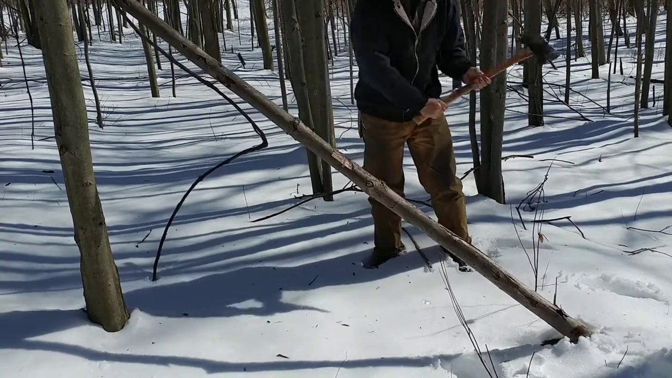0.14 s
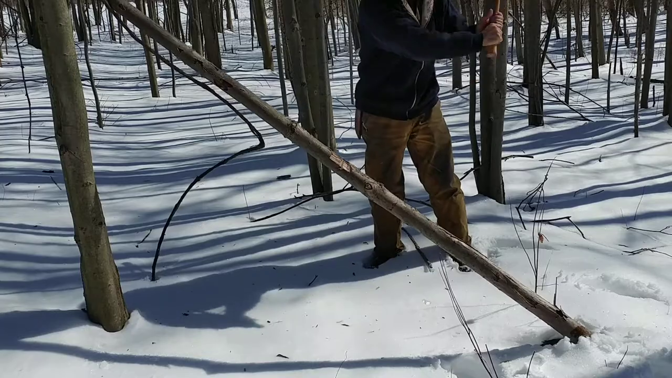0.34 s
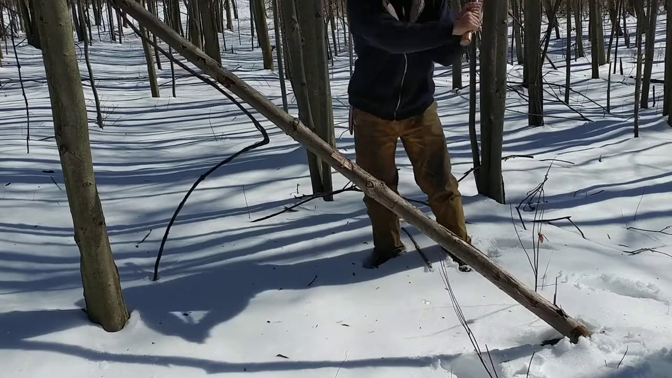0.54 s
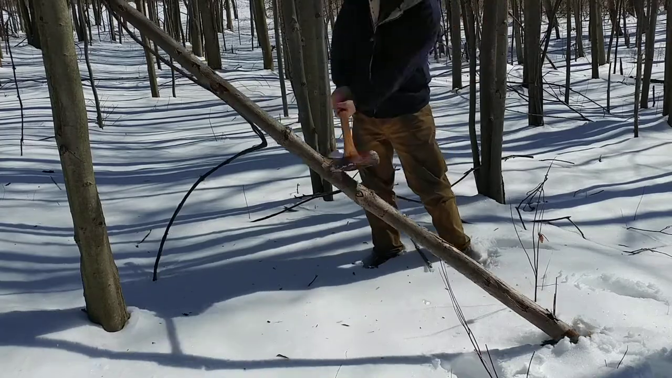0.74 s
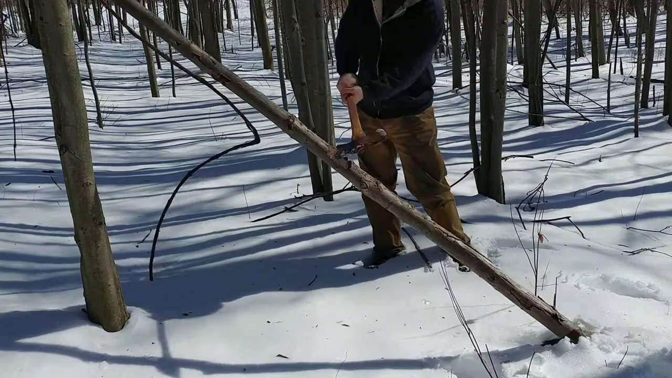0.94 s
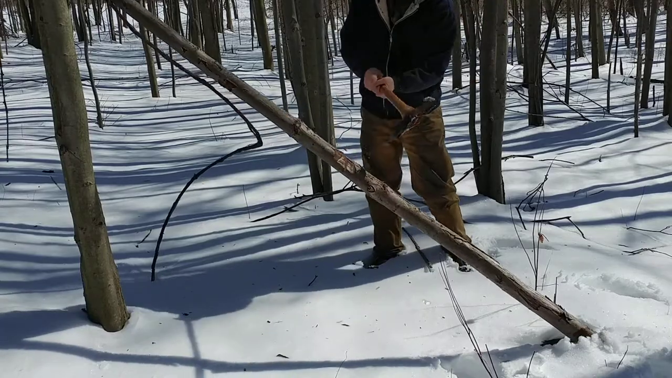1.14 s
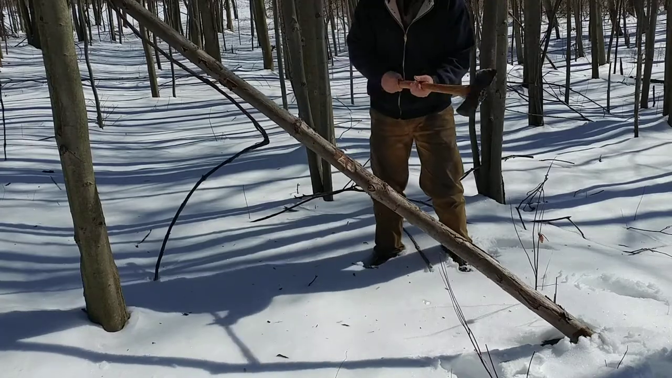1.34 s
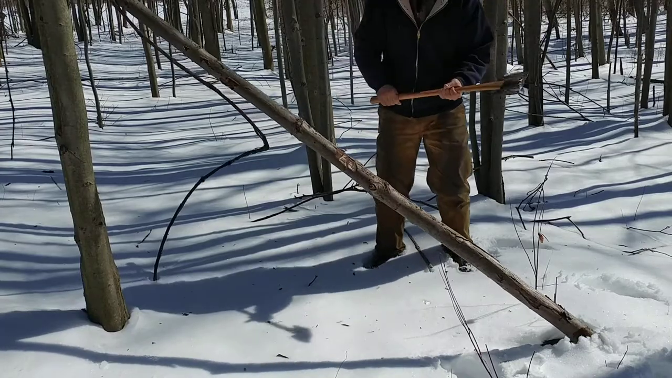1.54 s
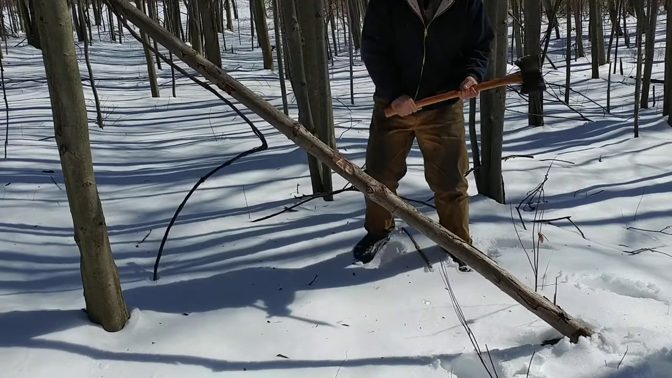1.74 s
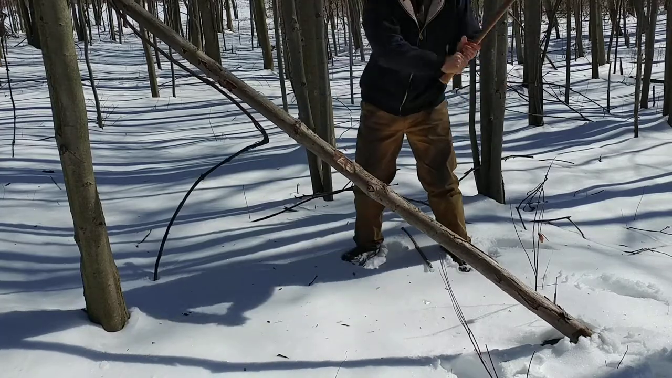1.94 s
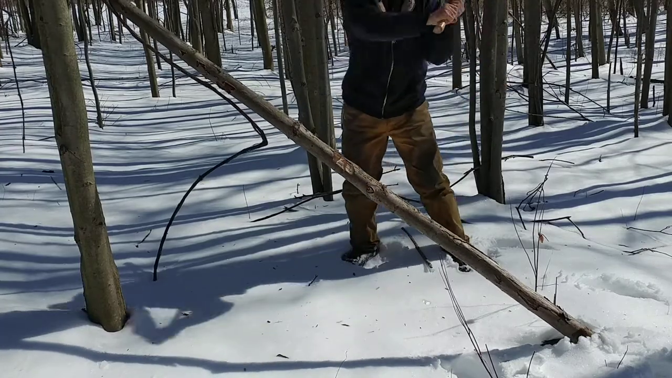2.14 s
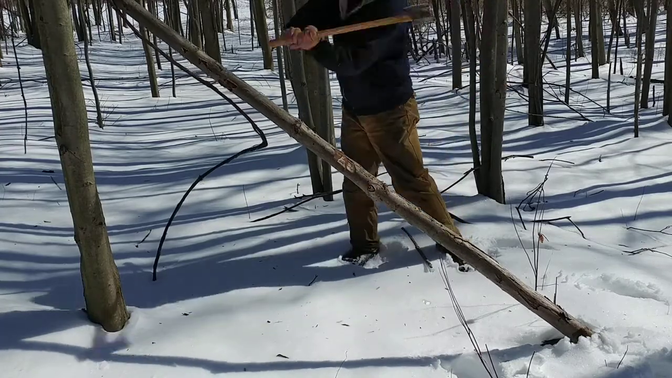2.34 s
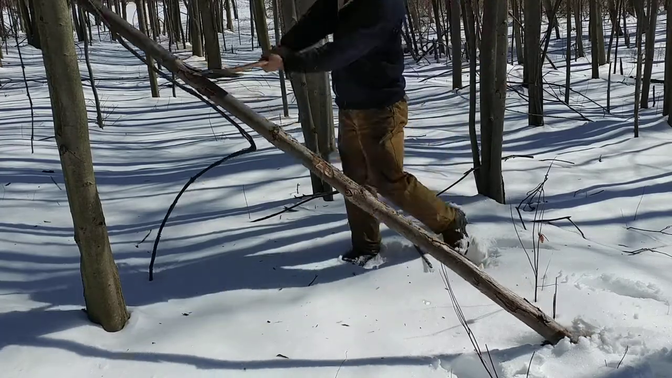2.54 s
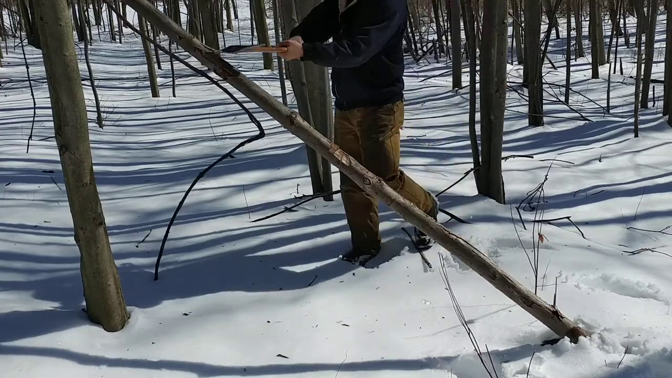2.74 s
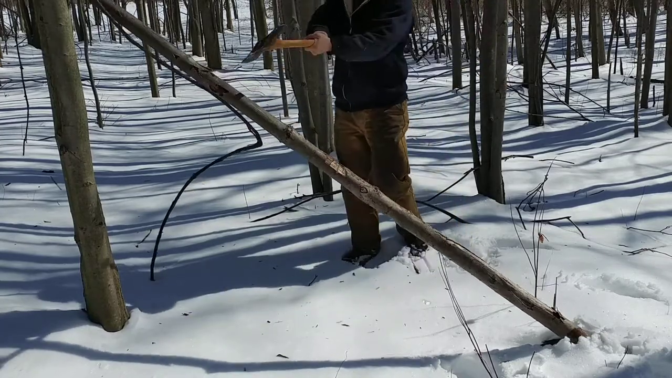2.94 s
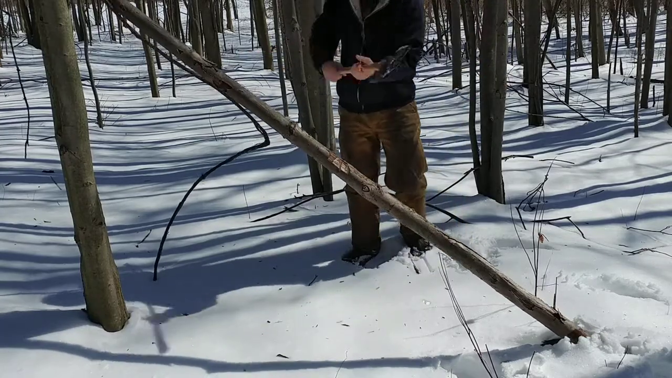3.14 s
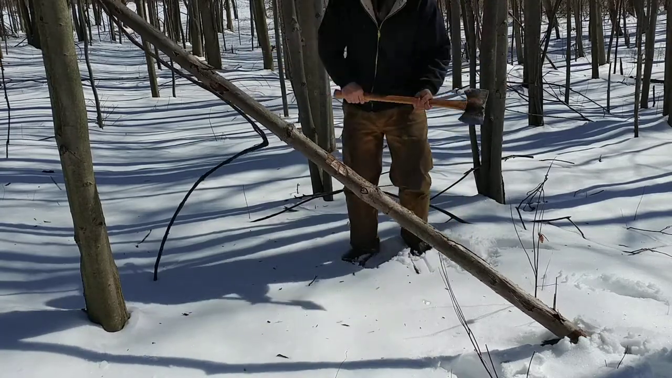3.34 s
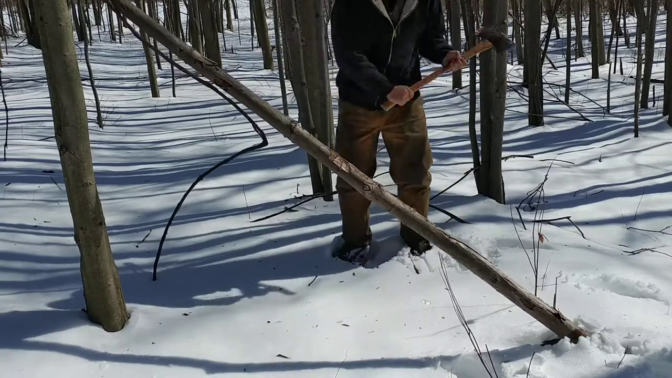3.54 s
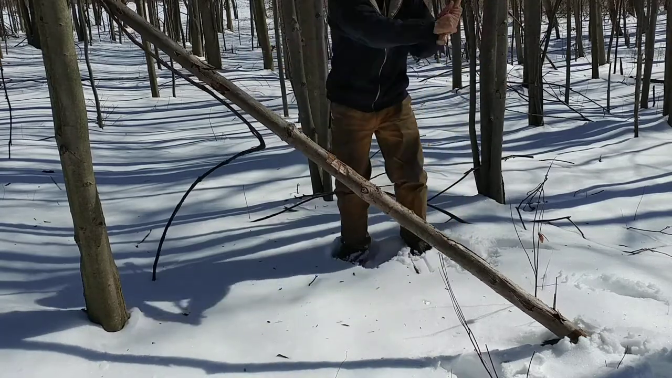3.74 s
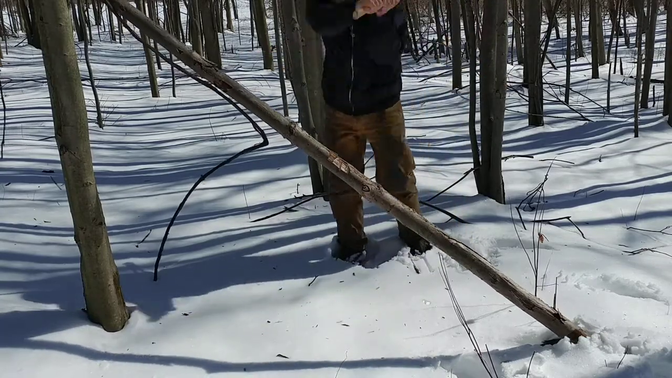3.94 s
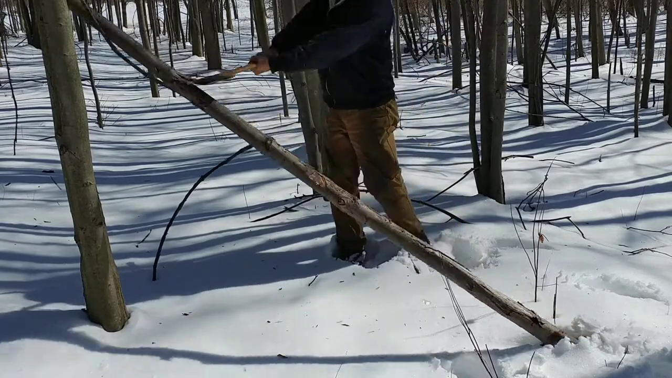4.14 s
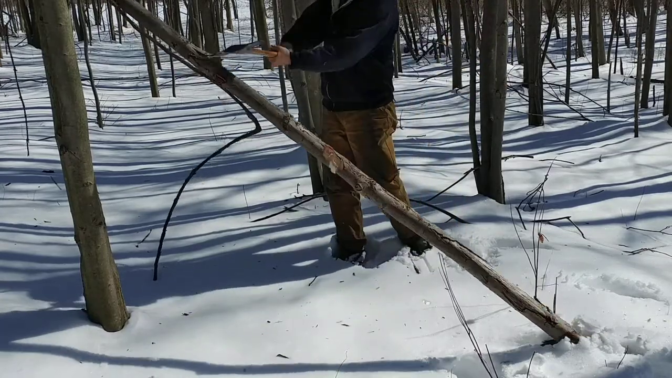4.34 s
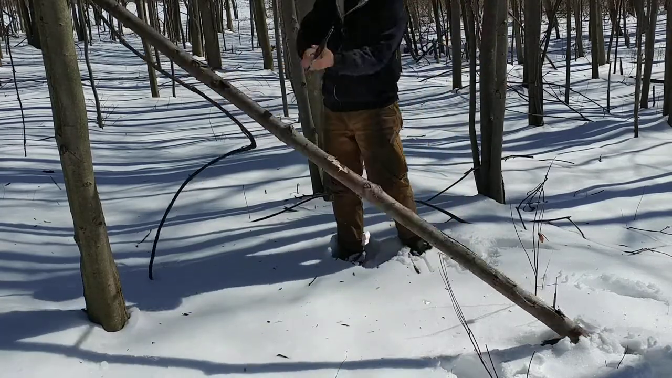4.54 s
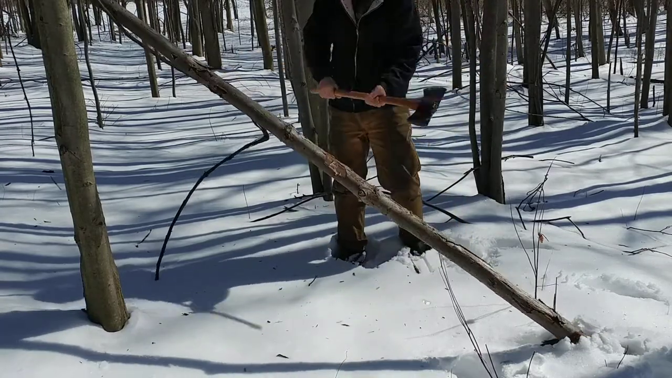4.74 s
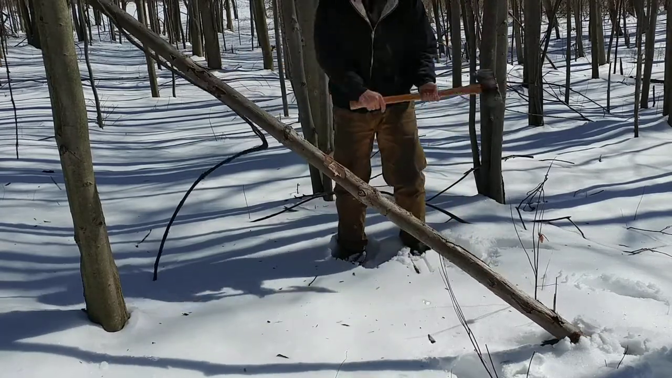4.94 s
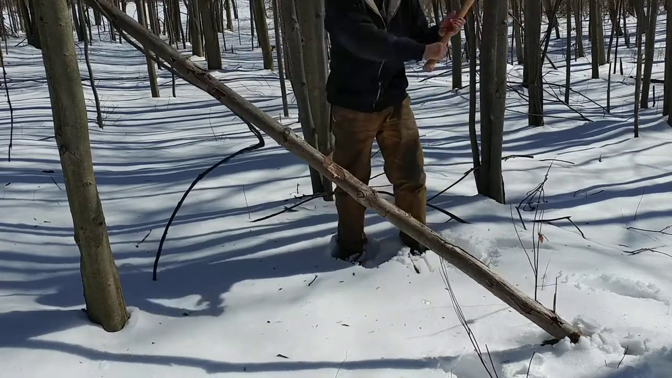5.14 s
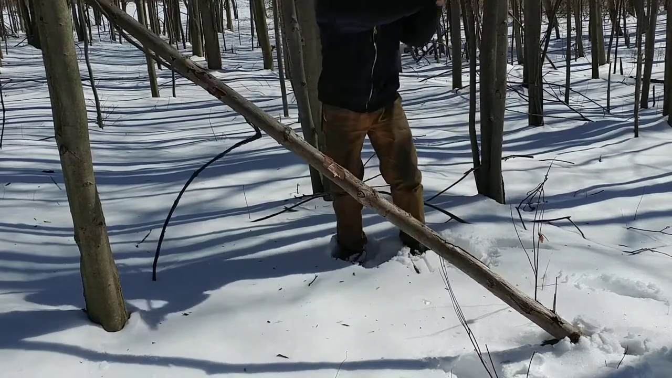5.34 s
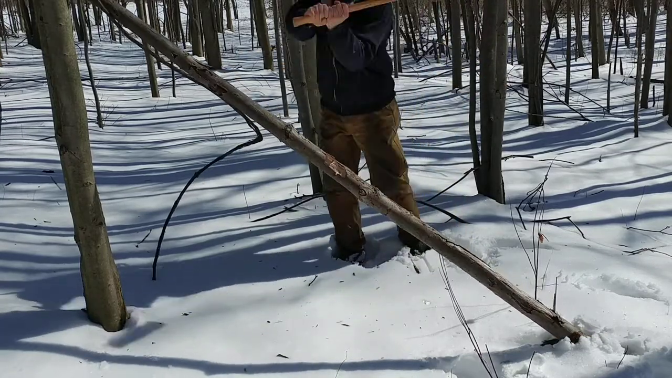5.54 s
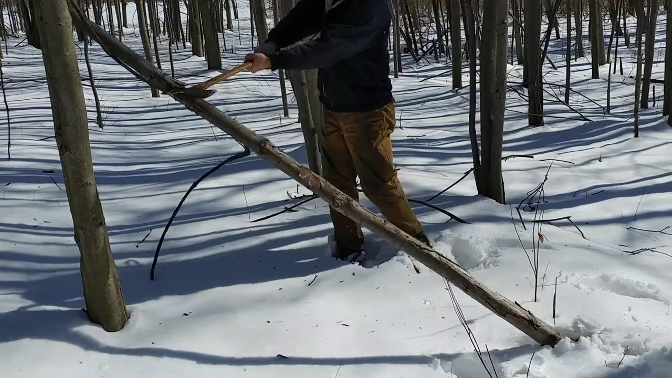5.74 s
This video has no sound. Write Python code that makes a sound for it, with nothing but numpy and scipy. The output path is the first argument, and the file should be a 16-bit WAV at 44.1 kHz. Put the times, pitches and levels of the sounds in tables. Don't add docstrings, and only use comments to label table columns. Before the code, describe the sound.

Outdoor wood chopping heard from nearby with a small stereo microphone, action slightly left. After a quiet opening with light wind buffeting and tiny metallic taps, four loud axe strokes land on dry standing wood. Each snaps brightly, thuds low, then tumbles into irregular hollow knocks and fine splintery crackle. Clothing and snow rustle in the pauses, bits of wood patter down, and the surrounding trunks return a soft, diffuse echo.

```python
import sys
import numpy as np
from scipy import signal
from scipy.fft import rfft, irfft, next_fast_len
from scipy.io import wavfile
from scipy.ndimage import uniform_filter1d, map_coordinates

SR = 44100
rng = np.random.default_rng(int(sys.argv[2]) if len(sys.argv) > 2 else 0)


def pcm_store(signal):
    levels = np.round(np.clip(np.atleast_2d(signal), -1, 1) * 32767)
    wavfile.write(sys.argv[1], SR, levels.astype(np.int16).T)


def voltage_ratio(level):
    return 10 ** (np.asarray(level, float) / 20)


N = 259308


def unit(x):
    return x / np.sqrt(np.mean(x ** 2) + 1e-20)


def along(points, hz):
    f, v = np.transpose(points)
    return np.interp(np.log(hz + 1), np.log(f + 1), v)


def wobble(rate):
    knots = rng.standard_normal(int(N * rate / SR) + 4)
    return map_coordinates(knots, [np.arange(N) * rate / SR])


def filtered(x, response):
    size = next_fast_len(x.shape[-1] + 8192)
    spectrum = rfft(x, size) * response(np.fft.rfftfreq(size, 1 / SR))
    return irfft(spectrum, size)[..., :x.shape[-1]]


def peak(f, hz, width):
    return 1j * f * width / (hz * hz - f * f + 1j * f * width)


def modes(f, rows, gains):
    return sum((-1) ** k * gains[k] * peak(f, hz, width) for k, (hz, width, _) in enumerate(rows))


def pair(length, alike):
    mid, side = rng.standard_normal((2, length))
    turn = np.arccos(alike) / 2
    return np.cos(turn) * mid + np.sin(turn) * side * np.array([[1], [-1]])


def patchy(x, depth_db):
    z = signal.stft(x, nperseg=256)[2]
    field = rng.standard_normal(z.shape[1:])
    for axis in (0, 1):
        field = uniform_filter1d(field, size=8, axis=axis)
    return signal.istft(z * voltage_ratio(depth_db * unit(field)), nperseg=256)[1][:, :N]


def add(track, s, sound, pan_db):
    track[:, round(s * SR):][:, :sound.shape[1]] += sound * voltage_ratio(np.array([[pan_db], [-pan_db]]) / 2)


# time in seconds, level in dB.
GUSTS = [(0, -56), (.15, -68), (.5, -60.5), (.87, -67.5), (1.05, -49), (1.5, -59.5), (1.85, -69.5),
         (2.08, -54.5), (2.55, -59), (3.05, -58.5), (3.3, -52.5), (3.55, -60), (3.72, -61), (3.9, -59.5),
         (4.2, -61.5), (4.45, -50), (5.0, -57), (5.2, -65), (5.7, -58), (5.88, -49)]


def gust_db():
    return np.interp(np.arange(N) / SR, *np.transpose(GUSTS))


# frequency in Hz, level in dB per Hz.
RUMBLE = [(15, -40), (25, -31), (38, -5), (59, 4.5), (135, -12), (290, -22), (350, -21), (460, -47.5),
          (770, -120)]


def wind():
    lumps = filtered(pair(N, .62), lambda f: voltage_ratio(along(RUMBLE, f)))
    lumps = lumps * voltage_ratio(0.67 * wobble(8.5))
    return voltage_ratio(gust_db() + 5.5) * unit(lumps)


# frequency in Hz, level in dB per Hz.
HUSH = [(150, -37), (250, -22.5), (337, -30.5), (450, -9.5), (567, -2.5), (1270, -22.5), (1650, -29),
        (2500, -32.5), (3250, -63.5), (5500, -120)]
# start in seconds, level in dB, t60 in seconds.
CROWN = [
    (0.918, -28, 1.3),
    (2.58, -37, 1.96),
    (4.271, -30.5, 1.77),
    (5.81, -55, 3),
]


def hush():
    t, gusts = np.arange(N) / SR, gust_db()
    murmur = sum(voltage_ratio(db - 60 * np.abs(t - s) / t60) * (t > s) for s, db, t60 in CROWN)
    far_wood = voltage_ratio(-60 + 0.37 * (gusts - gusts.mean()))
    flutter = voltage_ratio(1.8 * wobble(29))
    branches = filtered(pair(N, 0.12), lambda f: voltage_ratio(along(HUSH, f))) * flutter
    return (far_wood + murmur) * unit(branches)


# frequency in Hz, level in dB per Hz.
HISS = [(900, -45), (1500, -18), (2200, -15), (3300, -7), (4200, -8), (5900, -6), (7600, -1), (9050, -16),
        (10600, -4), (12000, -12), (15400, -17), (16000, -22), (16500, -45)]


def hiss():
    noise = filtered(pair(N, 0.73), lambda f: voltage_ratio(along(HISS, f))) * voltage_ratio(1.5 * wobble(5.4))
    whine = filtered(pair(N, .5), lambda f: peak(f, 11250, 200) ** 2) * voltage_ratio(2.5 * wobble(4))
    return voltage_ratio(-70) * unit(noise) + voltage_ratio(-79) * unit(whine)


# start in seconds, peak in dB, left over right in dB, tilt in dB per octave.
TAPS = [(0.541, -50, -6, -3), (0.1311, -60, 15, 19), (0.397, -22.5, 5.5, 7), (0.4005, -24, 2.5, -4.5),
        (0.407, -33.5, -2, -7.5), (0.547, -46, 9, -9), (0.5509, -38.5, -6, -3.5), (0.559, -41, -13, 0),
        (0.585, -58, -20, -15), (0.688, -66, -1, 0), (0.744, -36, 5.5, 1), (0.751, -47, 3, 5),
        (0.771, -58, 13, 5)]
# frequency in Hz, width in Hz, level in dB.
PULL = [(2830, 540, -7), (4820, 450, -2.5), (7180, 300, 13), (8230, 660, -3), (10500, 1700, 1),
        (13170, 300, -23)]


def zip_pull():
    out, t = np.zeros((2, N + SR)), np.arange(SR // 20) / SR
    hz, _, level_db = np.transpose(PULL)
    for s, db, pan_db, tilt_db in TAPS:
        gains = voltage_ratio(rng.normal(0, 1, len(PULL))) * voltage_ratio(level_db + tilt_db * np.log2(hz / 7000))

        def metal(f):
            ring = modes(f, PULL, gains)
            low_cut = f * f / (f + 1800 / 1j) ** 2
            return ring * np.abs(ring) ** 0.37 * low_cut

        scratch = pair(len(t), .9) * voltage_ratio(-60 * t / .015)
        tap = filtered(scratch, metal)
        add(out, s - .0003, voltage_ratio(db + 8) * tap / np.abs(tap).max(), pan_db - 4.5)
    return out[:, :N]


# middle in seconds, spread in seconds, level in dB,
# dull part over bright part in dB.
RUSTLE = [(0.43, 0.027, -59.5, -9), (0.589, 0.015, -56.5, 0), (0.78, 0.025, -71, -23),
          (1.121, 0.015, -69.5, 8), (1.249, 0.1, -59.5, 2), (1.488, 0.022, -56, -10.5),
          (1.569, 0.022, -65, 2), (1.74, 0.04, -67, -5), (1.829, 0.023, -64.5, -20),
          (2.031, 0.069, -58.5, -8), (2.302, 0.055, -66, -2.5), (2.942, 0.03, -49, -1.5),
          (3.03, 0.092, -63, 6), (3.13, 0.017, -54, -8), (3.2, 0.025, -61, -9), (3.348, 0.065, -56.5, -8),
          (3.62, 0.076, -61, -8), (3.851, 0.11, -71, -2.5), (4.234, 0.011, -63.5, 8.5),
          (4.601, 0.045, -46.5, -5), (4.757, 0.032, -51, -18), (4.871, 0.012, -50.5, 5),
          (4.901, 0.055, -54, -7), (5.066, 0.0095, -53, -12), (5.131, 0.02, -46.5, 0.5),
          (5.332, 0.015, -54, -0.5), (5.386, 0.016, -47.5, -2), (5.7, 0.12, -70, 1.5)]


def rustle():
    t = np.arange(N) / SR
    middle, spread, db, dull_db = np.transpose(RUSTLE)[..., None]
    swell = voltage_ratio(db) * np.exp(-((t - middle) / spread) ** 2 / 2)
    grain = voltage_ratio(1.3 * wobble(160) + 2.4 * wobble(2100))
    fine = patchy(pair(N, .6), depth_db=3) * grain
    coarse = patchy(pair(N, .6), depth_db=2.5) * grain
    bright = filtered(fine, lambda f: f ** 4 / (f ** 4 + 4500 ** 4))
    dull = filtered(coarse, lambda f: peak(f, 2950, 1600) ** 2)
    dull_swell = swell * voltage_ratio(dull_db - 12)
    return swell.sum(0) * unit(bright) + dull_swell.sum(0) * unit(dull)


# start in seconds, peak in dB, centre in Hz, rattle in dB.
BLOWS = [
    (0.903, -11.5, 807, -41.5),
    (0.913, -6, 610, -15.5),
    (2.569, -8.5, 674, -41.5),
    (2.575, 0, 824, -11),
    (4.255, -15, 568, -1.5),
    (4.262, 0, 752, -13),
    (5.801, -5, 650, -12.5),
    (5.806, -7.5, 815, -11),
]
# start in seconds, peak in dB, centre in Hz,
# rattle in dB.
REBOUNDS = [(0.931, -10, 654, -17.5), (0.998, -10.5, 1080, -7.5), (1.039, -19.5, 755, -8),
            (1.2, -18.5, 774, -5.5), (1.289, -18, 900, -13.5), (1.304, -22.5, 733, -8.5),
            (2.747, -11, 1033, 1), (2.841, -16, 843, -2), (2.887, -22.5, 650, -4),
            (2.904, -24.5, 794, -1.5), (3.004, -18.5, 804, -4.5), (3.119, -26, 745, 3),
            (3.255, -25.5, 748, -9), (4.365, -9, 758, -8.5), (4.434, -22.5, 720, 3.5),
            (4.477, -8.5, 986, -15.5), (4.522, -10, 824, -12.5), (4.65, -15, 670, -14.5),
            (4.726, -12.5, 613, -9.5), (4.846, -20.5, 574, -23), (5.056, -21.5, 728, -10.5),
            (5.353, -20.5, 676, -5.5)]
# start in seconds, peak in dB, centre in Hz.
SHUDDERS = [(0.92, -2, 621), (0.945, -24, 608), (0.959, -12.5, 866), (0.983, -18.5, 660), (1.01, -16, 666),
            (1.022, -9.5, 815), (1.234, -25, 655), (2.589, -14, 678), (2.6, -6.5, 642), (2.62, -12, 627),
            (2.643, -15, 693), (2.752, -12, 1005), (2.761, -9, 681), (3.134, -22.5, 636),
            (3.3135, -31, 677), (4.272, -10.5, 1205), (4.292, -12, 684), (4.309, -22, 624),
            (4.339, -12.5, 1260), (4.395, -13.5, 622), (4.449, -16.5, 704), (4.539, -12, 875),
            (4.578, -15.5, 710), (4.669, -21, 594), (4.745, -5.5, 767), (4.791, -18.5, 556),
            (5.814, -2, 887), (5.823, -14, 630), (5.848, -2.5, 747), (5.86, -18, 748)]
# start in seconds, peak in dB.
SETTLES = [
    (1.107, -60),
    (2.061, -45.5),
    (2.101, -42),
    (2.335, -41),
    (3.413, -45.5),
    (3.889, -46),
    (3.987, -45.5),
    (4.995, -36.5),
]


def contacts():
    spread_s = 0.003958
    blow_spread_s = .001
    settle_hz, clean_rattle_db = 520, -22.5
    blow_t60_s, grind_t60_s, clean_t60_s = 0.41, 0.12, 0.32
    clean = SHUDDERS + [(s, db, settle_hz) for s, db in SETTLES]
    touches = [(*row, blow_t60_s, blow_spread_s) for row in BLOWS]
    touches += [(*row, grind_t60_s, spread_s) for row in REBOUNDS]
    touches += [(*row, clean_rattle_db, clean_t60_s, spread_s) for row in clean]
    return sorted(touches)


# frequency in Hz, width in Hz, level in dB.
TRUNK = [(187, 230, -7.5), (290, 260, -7.5), (367, 40, -8.5), (465.3, 25, -7), (598, 130, -1),
         (628, 12, 6.5), (710, 19, 1), (835, 15, -1), (960, 19, -7), (1053, 17, -2.5), (1250, 17, -8.5),
         (1610, 30, -11), (1850, 230, -15), (2080, 180, -10)]


def trunk():
    out, t = np.zeros((2, N + SR)), np.arange(SR // 4) / SR
    push = np.exp(-(t / 0.00015 - 2) ** 2)
    level_db = np.transpose(TRUNK)[2]
    for s, db, hz, rattle_db, t60, spread in contacts():
        fibres = pair(len(t), .6)
        rattle = voltage_ratio(rattle_db - 60 * t / t60) * fibres * (1 - np.exp(-t / 0.00061))
        gains = voltage_ratio(rng.normal(0, 2.5, len(TRUNK))) * voltage_ratio(level_db)

        def body(f):
            spot = peak(f, 0.99 * hz, 0.38 * hz)
            trailing = np.exp(-4j * np.pi * spread * np.sqrt(1000 * f))
            return (0.39 * modes(f, TRUNK, gains) + spot) * (0.35 + spot) * trailing

        bare, *rung = filtered(np.vstack([push, push + rattle]), body)
        size = np.abs(bare).max()
        scrape = rattle[::-1] * voltage_ratio(-0.5 - 60 * t / 0.02)
        scrape = filtered(scrape, lambda f: peak(f, 1.5 * hz, 0.85 * hz) ** 4)
        add(out, s - .0005, voltage_ratio(db + 4) / size * scrape, -1.5)
        add(out, s - .0005 - spread, voltage_ratio(db) / size * np.array(rung), -1.5)
    return out[:, :N]


# start in seconds, level in dB, frequency in Hz, t60 in seconds.
THUDS = [(0.92, -22, 103, 0.34), (0.904, -26, 225, 0.12), (5.803, -23, 280, 0.085),
         (5.803, -29, 160, 0.079), (4.26, -28.5, 190, 0.157), (5.5, -38, 214, 0.056),
         (0.89, -29, 310.5, 0.25), (4.25, -18, 298, 0.079), (0.94, -15.5, 83, 0.056),
         (2.75, -43.5, 91, 0.81), (2.76, -28, 71, 0.25), (3.123, -41.5, 70, 0.046), (3.1, -60.5, 57, 0.19),
         (4.35, -36, 101, 0.8), (4.363, -33, 61.7, 0.38), (6.1, -46, 94, 0.15), (5.802, -27, 97.5, 0.19)]


def thuds():
    out, t = np.zeros((2, N + SR)), np.arange(SR // 2) / SR
    for s, db, hz, t60 in THUDS:
        onset = (1 - np.exp(-t * hz * 2)) ** 2
        thud = np.sin(2 * np.pi * hz * t) * voltage_ratio(db - 60 * t / t60) * onset
        add(out, s, np.array([thud, thud]), 0)
    return out[:, :N]


# start in seconds, peak in dB, centre in Hz, spray in dB, spray t60 in seconds.
SNAPS = [(0.902, -4, 6600, -15, 0.5), (0.9944, -50, 9950, -12.5, 0.22), (0.998, -10.5, 4650, -6.5, 0.46),
         (1, -5.5, 9700, -27, 0.14), (1.0204, -13, 6900, -19, 0.37), (2.5695, -3.5, 9900, -20, 0.28),
         (2.6211, -4.5, 5830, -5, 0.45), (2.6428, -16.5, 5960, -10.5, 0.36),
         (2.7547, -18.5, 5160, -7.5, 0.5), (3.115, -50, 1510, 8, 0.2), (4.219, -35.5, 10270, 1.5, 0.22),
         (4.2556, -3.5, 9750, -10.5, 0.47), (4.75, -45.5, 2700, -16.5, 0.27), (5.316, -39, 10100, 4, 0.56),
         (5.802, -3.5, 10500, -18.5, 1)]
# start in seconds, peak in dB, centre in Hz, burst length in seconds,
# spray in dB.
SPLITS = [
    (2.749, -14, 1520, 0.0066, -24),
    (2.754, -6.5, 2820, 0.0017, -28),
    (2.76, -17, 2080, 0.0025, -13),
    (3.313, -39.5, 1780, 0.0036, -38),
    (4.344, -24, 2933, 0.008, -9),
]


def snaps():
    out, t = np.zeros((2, N + SR)), np.arange(SR // 2) / SR
    tear_s, split_t60_s = .0042, 0.19
    grit_db = np.tile(2.5 * wobble(400) + 1.2 * wobble(60), 2)
    tears = [(s, db, hz, tear_s, spray_db, t60) for s, db, hz, spray_db, t60 in SNAPS]
    tears += [(*row, split_t60_s) for row in SPLITS]
    for s, db, hz, length, spray_db, t60 in tears:
        age = t / length
        burst = voltage_ratio(5.87 * rng.standard_normal(len(t)) - 2.4 * age - 10 * np.clip(age - 1, 0, None))
        spray = voltage_ratio(spray_db - 60 * t / t60 + grit_db[round(s * SR):][:len(t)])
        tear = pair(len(t), .85) * burst + pair(len(t), .6) * spray
        tear = filtered(tear, lambda f: 0.23 / (1 + 1j * f / (0.5 * hz)) + peak(f, hz, hz))
        add(out, s - .0003, voltage_ratio(db - 2) * tear / np.abs(tear).max(), 0)
    return out[:, :N]


# start in seconds, level in dB, centre in Hz, t60 in seconds.
CRACKLE = [(0.906, -27, 1260, 0.52), (1.001, -32.5, 1700, 0.62), (2.573, -31, 1930, 0.18),
           (2.621, -29.5, 3200, 0.37), (2.66, -39.5, 1800, 0.63), (2.749, -21, 1950, 0.15),
           (2.752, -27, 3100, 0.11), (3.119, -37, 1890, 0.23), (4.258, -36, 1480, 0.79),
           (4.337, -34.5, 2800, 0.19), (4.391, -35, 1940, 0.34), (4.477, -33, 1395, 0.22),
           (4.544, -42, 2060, 0.15), (4.728, -52.5, 2460, 0.28), (4.862, -46, 3080, 0.086),
           (5.11, -53.5, 2720, 0.29), (5.11, -48, 980, 0.32), (5.32, -50, 3000, 0.15),
           (5.36, -51, 2730, 0.3), (5.805, -40.5, 1500, 0.5)]


def crackle():
    out, age = np.zeros((2, N + SR)), np.arange(256) / SR
    scatter, cycles, size_db = 0.39, 14, 5.5
    side_turn = 2.2
    for s, db, hz, t60 in CRACKLE:
        when, pitch, size, side, turn = rng.random((5, 240, 1))
        t = when * t60 * .7
        f = hz * np.exp(scatter * 3 * (pitch - .5))
        start_db = db - 60 * t / t60 + size_db * 4 * (size - .5)
        level = voltage_ratio(start_db - 60 * age * f / cycles / 2) * (1 - np.exp(-age * f))
        at = (((s + t) * SR).astype(int) + np.arange(256)).ravel()
        for port, sign in enumerate((1, -1)):
            tone = np.sin(2 * np.pi * f * age + sign * side_turn * (turn - .7))
            grains = level * voltage_ratio(sign * 4.8 * (side - 1)) * tone
            out[port] += np.bincount(at, grains.ravel(), N + SR)
    return out[:, :N]


# start
# in seconds, peak in dB, centre in Hz.
CHIPS = [(1.3715, -46, 6400), (3.3137, -41.5, 1970), (1.447, -54, 3940), (1.47, -51, 7200),
         (1.4879, -58, 7860), (1.575, -51, 7500), (1.72, -52, 11100), (1.795, -53, 10650),
         (2.064, -71, 6800), (4.412, -37, 9000), (4.48, -33, 11400), (4.501, -37, 10500),
         (2.932, -48, 7200), (2.975, -39, 11000), (3.0828, -45, 7600), (3.1644, -45.5, 7780),
         (3.3146, -32, 6550), (3.332, -34, 10200), (3.702, -56.5, 5960), (4.1196, -50.5, 9440),
         (4.4355, -30.5, 10140), (4.4663, -31.5, 10300), (4.5692, -20, 10500), (4.728, -62, 2740),
         (4.8494, -52, 3020), (4.8948, -40, 6950), (5.0037, -41, 6700), (5.1062, -35, 10620),
         (5.3655, -36, 10360), (5.635, -53.5, 8040)]


def chips():
    out, t = np.zeros((2, N + SR)), np.arange(SR // 15) / SR
    for s, db, hz in CHIPS:
        puff = pair(len(t), 0.43) * voltage_ratio(-60 * t / 0.02)
        click = 10 * (t == 0)
        tick = filtered(puff + click, lambda f: peak(f, hz, 0.65 * hz + 100) ** 2)
        add(out, s - .0003, voltage_ratio(db + 8.5) * tick / np.abs(tick).max(), 0)
    return out[:, :N]


# frequency in Hz, t60 in seconds.
WOODS = [(100, 0.83), (600, 0.28), (2000, 0.22), (8000, 0.49), (15000, 0.064)]


def woods(x):
    hz, t, z = signal.stft(rng.standard_normal((2, SR * 3 // 4)), SR, nperseg=256)
    turn = np.pi / 4 * np.clip(hz / 1300, 0, 1)[:, None]
    z = np.cos(turn) * z[0] + np.sin(turn) * z[1] * np.array([1, -1])[:, None, None]
    decay = voltage_ratio(-60 * t / along(WOODS, hz)[:, None])
    tail = signal.istft(z * decay, SR, nperseg=256)[1]
    late = np.pad(x, (300, 0))[None]
    return signal.fftconvolve(late, tail / np.linalg.norm(tail[0]), axes=1)[:, :N]


# frequency in Hz, left over right in dB.
SHADOW = [(60, -6.5), (110, 0.5), (200, 0), (380, 3), (700, -1.3), (1290, -1.5), (2380, 1.5), (4400, -4),
          (8120, 9), (15000, 15)]


def ports(x, lead_s):
    side = np.array([[1], [-1]]) / 2
    return filtered(x, lambda f: voltage_ratio(side * along(SHADOW, f)) * np.exp(2j * np.pi * f * lead_s * side))


# frequency in Hz, gain in dB.
HOUSING = [(880, -17.5), (1500, 0), (1730, 6.5), (1870, 6.5), (3520, -2), (4220, -10.5), (7390, -3),
           (9040, -17), (10300, -7), (11600, -13), (15200, -20), (16000, -30.5), (16500, -72.5)]


def scene():
    def tinted(x):
        return filtered(x, lambda f: voltage_ratio(along(HOUSING, f) + 12))

    wood = trunk() + thuds() + crackle()
    splinters = tinted(snaps() + chips())
    near = wood + splinters + zip_pull() + tinted(rustle())
    echo = voltage_ratio(-6) * woods(wood.mean(0)) + voltage_ratio(-13) * woods(splinters.mean(0))
    return ports(near, lead_s=0.00021) + echo + wind() + hush() + hiss()


def top_cut(x):
    return signal.sosfilt(signal.butter(12, 16810, fs=SR, output="sos"), x)


def record(dry):
    held = dry / (1 + np.abs(dry / .8) ** 4) ** .25
    mix = filtered(held, lambda f: (f / (f + 26 / 1j)) ** 2 / (1 + (f / 16500) ** 90))
    return top_cut(mix)


dry = scene()
out = record(dry)
pcm_store(out)
```